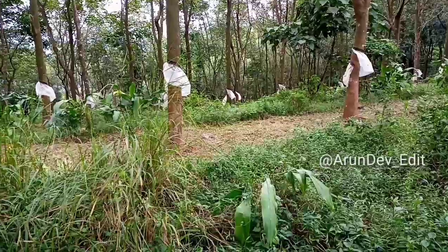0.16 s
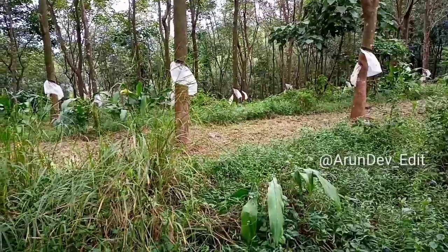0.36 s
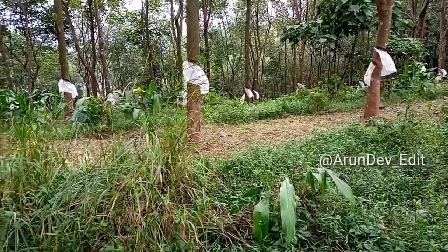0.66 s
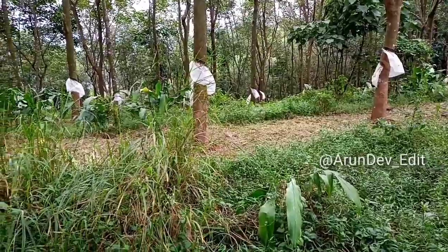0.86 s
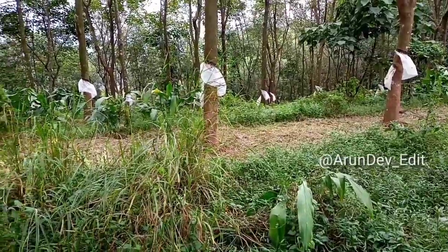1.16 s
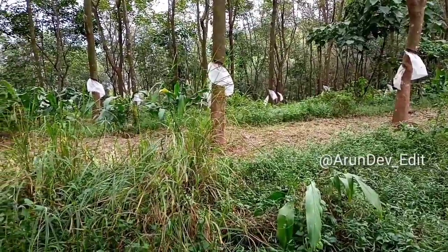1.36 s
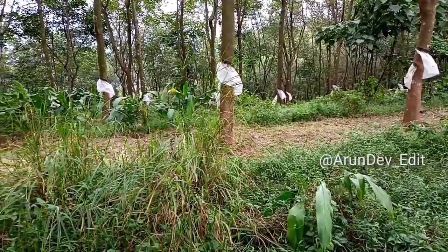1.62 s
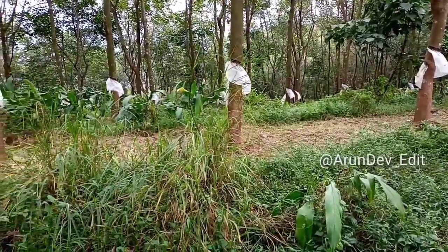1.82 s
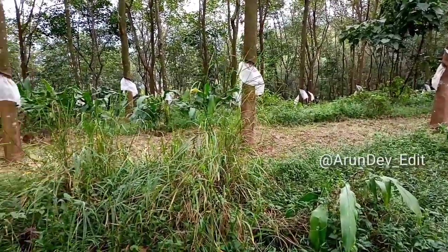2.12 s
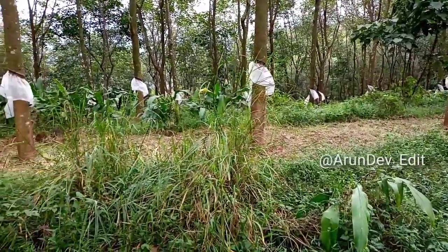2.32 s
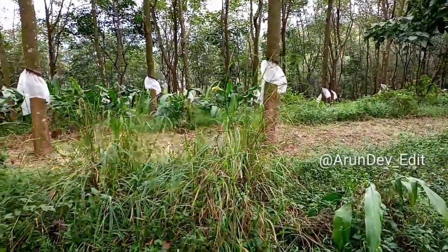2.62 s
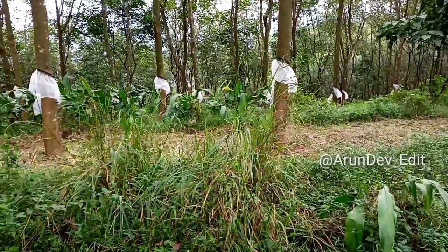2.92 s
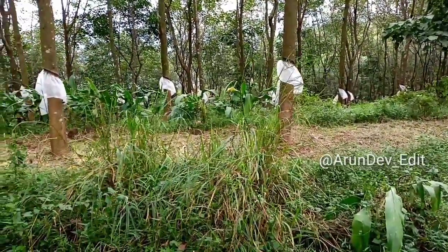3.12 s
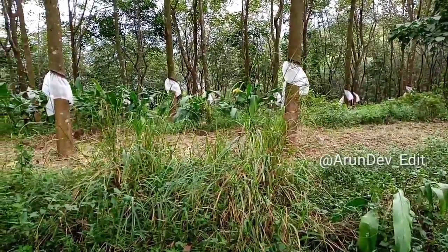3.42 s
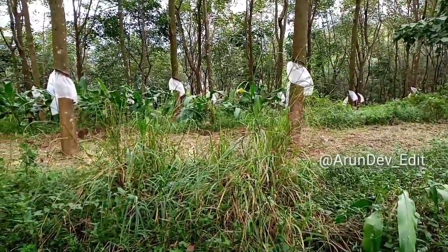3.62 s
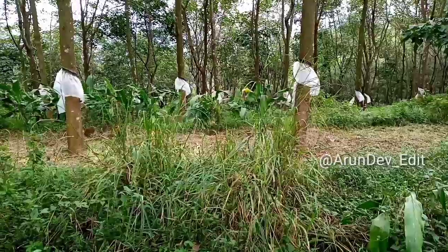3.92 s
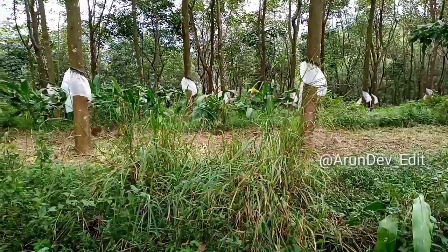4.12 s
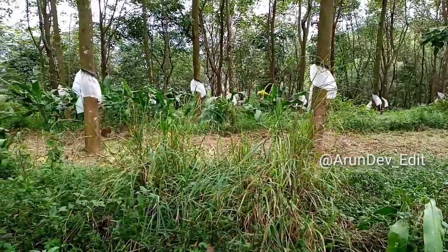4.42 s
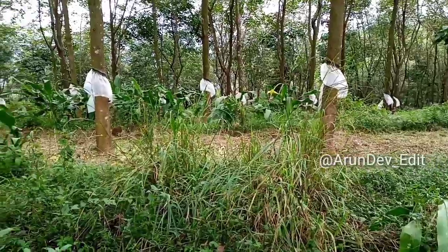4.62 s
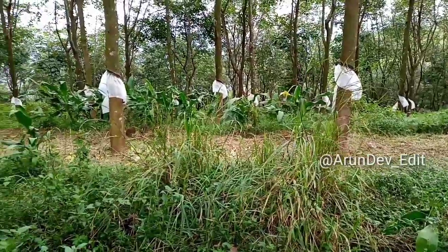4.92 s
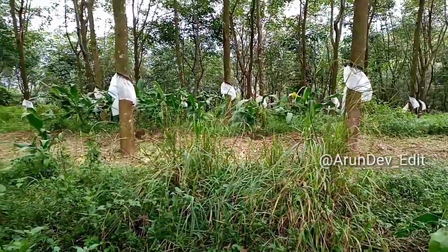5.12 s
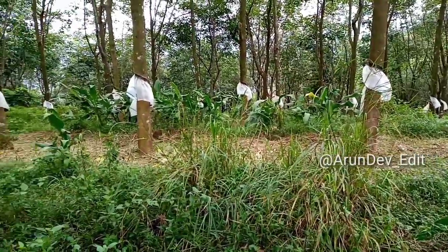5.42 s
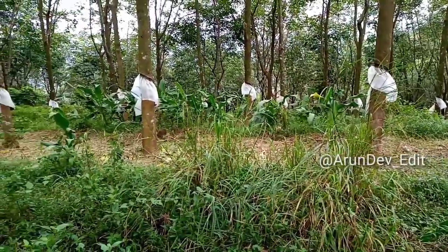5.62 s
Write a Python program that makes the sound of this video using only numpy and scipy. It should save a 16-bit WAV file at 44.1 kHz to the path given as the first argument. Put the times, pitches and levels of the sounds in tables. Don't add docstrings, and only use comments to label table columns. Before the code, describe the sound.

From 0 seconds a shrill cicada drone fills a wooded plantation and never stops. Two near singers ring with a thin, buzzing metallic tone around 9 kHz, with only faint lower hums. One steps down through short notes about six times a second, then leaps up again; the other jumps and slides more irregularly. Behind them a distant chorus swells slowly as a noisy, ringing hiss, strongest near 4 seconds, then eases. At about 2.5 seconds a sharp knock, a click with a brief low thump, strikes the microphone. After roughly 3.5 seconds the pitch steps flatten into longer notes with a rapid fluttering warble. Soft, dull handling bumps come around 4.2 and 4.6 seconds; a tiny dry tick at 5.45 is followed by a faint thud at 5.5. Very faint cricket pulses, small rasps, leaf hiss and low rumble lie beneath. The drone continues to the end at about 5.8 seconds.

```python
import sys
import numpy as np
from scipy import signal
from scipy.fft import rfft, irfft, next_fast_len
from scipy.io import wavfile
from scipy.ndimage import uniform_filter1d, map_coordinates

SR = 44100
rng = np.random.default_rng(int(sys.argv[2]) if len(sys.argv) > 2 else 0)


def boost_factor(decibels):
    exponent = np.asarray(decibels, float) / 20
    return 10 ** exponent


def bounce(signal):
    frames = np.transpose(np.atleast_2d(signal))
    limited = np.clip(frames, -1, 1)
    pcm = np.round(limited * 32767).astype(np.int16)
    wavfile.write(sys.argv[1], SR, pcm)


N = 254016
TIME = np.arange(N) / SR


def unit(x):
    return x / np.sqrt(np.mean(x ** 2) + 1e-20)


def curves(rows):
    times, *columns = np.transpose(rows)
    return [np.interp(TIME, times, column) for column in columns]


def wobble(rate):
    knots = rng.standard_normal(1000)
    return map_coordinates(knots, [TIME * rate])


def filtered(x, response):
    length = next_fast_len(N + SR // 2)
    hz = np.fft.rfftfreq(length, 1 / SR) + 1e-3
    return irfft(rfft(x, length) * response(hz), length)[:N]


def rush(response, patchy_db, size=512, span=(4, 14)):
    grains = signal.stft(rng.standard_normal(N + size), nperseg=size)[2]
    field = uniform_filter1d(rng.standard_normal(grains.shape), span[0], axis=0)
    field = uniform_filter1d(field, span[1], axis=1)
    noise = signal.istft(grains * boost_factor(patchy_db * unit(field)), nperseg=size)[1][:N]
    return unit(filtered(noise, response))


def spectrum(points):
    f, db = np.transpose(points)
    return lambda hz: boost_factor(np.interp(np.log(hz), np.log(f), db))


def band(hz, width):
    return lambda f: 1 / np.sqrt(1 + (2 * (f - hz) / width) ** 4)


def swelling(s, half):
    return np.exp(-((TIME - s) / half) ** 2)


# (frequency [Hz], level [dB])
AIR_COLOUR = [(60, -26), (200, -12), (500, -8), (1000, -12), (1900, -4.5), (2600, -2.5), (3200, -7),
              (5400, -11), (7700, 1), (10700, -4.5), (12900, -3), (14000, -5), (14800, 11.5), (15500, 9)]
# (frequency [Hz], level [dB])
RUMBLE_COLOUR = [(25, -41), (60, -7), (110, -2.5), (200, -6), (350, -19), (700, -70)]


def air():
    rumble = boost_factor(-75.5 + 1.1 * wobble(4.02)) * rush(spectrum(RUMBLE_COLOUR), patchy_db=2.5)
    hiss = boost_factor(-51.8 + 0.87 * wobble(25)) * rush(spectrum(AIR_COLOUR), patchy_db=1.6)
    return hiss + rumble


# (time [s], level [dB])
CHORUS_LEVEL = [(0, -42), (.15, -39.5), (1.35, -36), (2.2, -34), (2.5, -34.5), (3.88, -32), (4.12, -34.5),
                (5.25, -35.5), (5.76, -39)]
# (frequency [Hz], width [Hz], level [dB])
CHORUS_BANDS = [(2336, 135, -21.5), (4613, 325, -28), (7070, 575, -22), (8470, 510, -13), (9204, 500, 0.5),
                (11570, 630, -30.5), (14900, 380, -56)]


def chorus():
    def resonances(f):
        return np.sqrt(sum((boost_factor(db) * band(hz, width)(f)) ** 2 for hz, width, db in CHORUS_BANDS))

    level_db, = curves(CHORUS_LEVEL)
    blur = rush(resonances, patchy_db=3.3, size=2048, span=(2, 5))
    low_voices = filtered(blur, lambda f: f < 8900)
    low_db = -2.5 + 11 * np.exp(-TIME / 1.7)
    return boost_factor(level_db + 0.26 * wobble(6.35)) * (blur + (boost_factor(low_db) - 1) * low_voices)


# (time [s], half length [s], level [dB])
CRICKET_CALLS = [
    (.1, .15, -75),
    (.65, .18, -71),
    (1.4, .22, -72),
    (1.9, .1, -75),
    (3.4, .12, -76),
    (4.9, .2, -72),
]
# (time [s], half length [s], frequency [Hz], width [Hz], level [dB])
RASPS = [
    (2.69, .04, 6300, 900, -60),
    (4.79, .04, 6500, 900, -60),
]


def other_insects():
    calls = sum(boost_factor(db) * swelling(s, half) for s, half, db in CRICKET_CALLS)
    cricket = calls * boost_factor(-11 + 5 * wobble(30)) * rush(band(3500, 80), patchy_db=1.1)
    flutter_db = 2.8 * wobble(30) + 2.2 * wobble(60)
    katydid = boost_factor(-67 + flutter_db) * rush(band(15200, 900), patchy_db=-1.0)
    chirps = boost_factor(-68.5) * rush(band(6350, 800), patchy_db=6, size=1024, span=(2, 3))
    out = cricket + katydid + chirps
    for s, half, hz, width, db in RASPS:
        out += boost_factor(db) * swelling(s, half) * rush(band(hz, width), patchy_db=1.1)
    return out


# (time [s], frequency [Hz], length [cycles], peak level [dB])
BUMPS = [(1.403, 290, 2.3, -66), (2.054, 200, 1.1, -62), (2.071, 315, 0.92, -58.5),
         (3.978, 130.3, 0.62, -59.5), (4.169, 104, .8, -48.5), (4.192, 109.7, 1.5, -56.5),
         (4.584, 190, 2.9, -61.5), (4.628, 191, 1.2, -56), (4.641, 207, 0.84, -54), (4.668, 182, 4.8, -59),
         (4.687, 209, 0.65, -56), (4.72, 430, 2.9, -71), (5.452, 6900, 3.7, -27.5), (5.29, 543, 6, -73),
         (5.506, 420, 0.64, -48), (5.511, 347, 1, -58.5)]


def bumps():
    out = np.zeros(N)
    for s, hz, cycles, db in BUMPS:
        turns = (TIME - s) * hz
        out += boost_factor(db) * np.exp(-(turns / cycles) ** 2) * np.cos(2 * np.pi * turns + 5.0)
    return out


# (corner [Hz], Q [1])
LOW_CUT = [(75, 0.74), (75, 0.68)]


def knock():
    knock_s, knock_db = 2.53397, -18.7

    def response(f):
        step = SR / (2j * np.pi * f)
        delay_and_softening = np.exp(-2j * np.pi * f * knock_s - (f / 9000) ** 2)
        high_pass = np.prod([-f * f / (c * c - f * f + 1j * f * c / q) for c, q in LOW_CUT], axis=0)
        return step * delay_and_softening * high_pass

    return boost_factor(knock_db) * filtered(signal.unit_impulse(N), response)


def forest(x):
    t = np.arange(SR // 2) / SR
    tail = rng.standard_normal(len(t)) * boost_factor(-60 * t / 0.24)
    return signal.fftconvolve(x, tail / np.linalg.norm(tail))[:N]


def cicada(song, pulse, body, leap_db, sweep=0, chop=0):
    hz, *levels = song
    leaping = np.clip((np.abs(np.gradient(hz)) * SR - 250) / 200, 0, 1)
    quiet_db = -leap_db * uniform_filter1d(uniform_filter1d(leaping, size=1100), size=1100)
    warble = 2 * np.pi * np.cumsum(18.3 + 5 * wobble(8)) / SR
    hz = hz + 1.9 * wobble(40)
    hz = hz + sweep * (signal.sawtooth(warble, .7) + .7 * wobble(12) + .9 * wobble(150))
    tone = 2 * np.pi * np.cumsum(hz) / SR
    beat = 2 * np.pi * np.cumsum(curves(pulse)[0] + 4 * wobble(30)) / SR
    out = np.zeros(N)
    for partials, db in zip(body, levels + [np.mean(levels, axis=0)]):
        for (harmonic, side), rel_db in partials.items():
            depth_db = 1.8 * (1 + .9 * (rel_db < 0))
            gain = boost_factor(db + rel_db + depth_db * wobble(32))
            out += gain * np.sin(harmonic * tone + side * beat + .5 * wobble(20))
    return np.sqrt(2) * boost_factor(quiet_db) * (1 - chop * np.cos(warble - .8)) * out


def sung(ends, effort):
    hz, ring_db, octave_db, hum_db = curves(ends)
    swell_db, buzz_db = curves(effort)
    return [hz, ring_db + swell_db, buzz_db, octave_db, hum_db]


# (start [s], fundamental pitch [Hz])
SLIDER_NOTES = [(0.0, 2225), (0.15, 2292), (0.39, 2204), (0.57, 2305), (0.8, 2227), (0.99, 2310),
                (1.22, 2253), (1.41, 2323), (1.59, 2267), (1.79, 2221), (1.97, 2320), (2.14, 2284),
                (2.3, 2242), (2.49, 2326), (2.64, 2300), (2.79, 2265), (2.95, 2324), (3.1, 2297),
                (3.27, 2278), (3.42, 2326), (3.84, 2251), (3.99, 2296), (4.59, 2297), (5.17, 2296),
                (5.72, 2304)]
# (ring or 4th harmonic [dB], octave [dB], hum or fundamental [dB])
SLIDER_LEVELS = [(-58, -85, -76), (-37, -66, -63), (-39, -67, -59), (-34.5, -62.5, -73), (-32, -69, -62),
                 (-34, -68, -59.5), (-45, -65, -66), (-28.5, -62.5, -55.5), (-42, -59.5, -75),
                 (-31, -65.5, -64), (-36, -62, -57), (-38.5, -64, -67), (-37, -58, -72),
                 (-33.5, -62, -57.5), (-41, -60, -54), (-26, -57.5, -63), (-32.5, -58.5, -58),
                 (-39, -61, -53.5), (-36, -58, -63.5), (-36.5, -58, -54), (-36.5, -60.5, -56),
                 (-33.5, -58, -61.5), (-35.5, -59.5, -60), (-36, -61.5, -57.5), (-39, -56.5, -54)]
# (time [s], leap length [s])
SLIDER_LEAP = [(0, .03), (.2, .13), (1.3, .11), (1.5, .075), (2.05, .07), (2.2, .03), (5.76, .025)]
# (time [s], ring swell [dB], buzz or strongest ring sideband [dB])
SLIDER_EFFORT = [(0, 4, -53), (.2, 1.5, -39), (1, -3, -41), (1.6, -1.5, -42), (2.3, 4.5, -50),
                 (2.7, -4.5, -46), (3.2, 3, -40), (3.5, 2.5, -55), (3.7, -1, -34.5), (4.1, 1, -35),
                 (4.28, -1.5, -40.5), (4.43, 3, -37), (4.62, -7, -31.5), (4.78, 8.5, -51),
                 (4.95, -4.5, -39), (5.2, -2, -40), (5.44, 1, -35.5), (5.76, 5, -34)]
# (time [s], rate [1/s])
SLIDER_PULSE = [(0, 296), (2.8, 292), (3.6, 284), (4.1, 278), (5.76, 279)]
SLIDER_PARTIALS = [
    {(4, 0): 0, (4, 1): -19},
    {(4, -1): 0, (4, -2): -19, (4, -3): -29},
    {(2, 0): 0, (2, -1): -17, (2, 1): -18},
    {(1, 0): 0, (1, 1): -28},
    {(3, 0): -10, (3, -1): -30, (3, -2): -22, (3, -3): -32, (3, 2): -22, (5, 0): -17, (5, -1): -22, (6, 0): -26, (6, -1): -28},
]


def slider():
    slide_hz_per_s, floor_hz = 104, 2242
    ends = []
    next_starts = [s for s, _ in SLIDER_NOTES[1:]] + [N / SR]
    for (s, hz), following, db in zip(SLIDER_NOTES, next_starts, SLIDER_LEVELS):
        length = following - s - np.interp(s, *np.transpose(SLIDER_LEAP))
        is_long = length > .3
        fall = min(length, (hz - floor_hz) / slide_hz_per_s) * is_long
        low = hz - slide_hz_per_s * fall
        ends += [(s, hz, *db), (s + fall, low, *db), (s + length, low, *db)]
    return cicada(sung(ends, SLIDER_EFFORT), SLIDER_PULSE, SLIDER_PARTIALS, leap_db=22, chop=.3)


# (start [s], fundamental pitch [Hz])
STEPPER_NOTES = [(0.03, 2377), (0.2, 2339), (0.36, 2412), (0.54, 2371), (0.7, 2342), (0.87, 2412),
                 (1.03, 2372), (1.21, 2337), (1.37, 2405), (1.52, 2365), (1.7, 2338), (1.87, 2400),
                 (2.03, 2361), (2.2, 2332), (2.32, 2397), (2.52, 2361), (2.68, 2388), (2.82, 2359),
                 (2.98, 2386), (3.12, 2361), (3.27, 2375), (3.45, 2383), (3.62, 2370), (3.82, 2379),
                 (3.98, 2363), (4.11, 2373), (4.27, 2362), (4.5, 2358)]
# (ring [dB], octave [dB], hum [dB])
STEPPER_LEVELS = [(-41.5, -60, -58.5), (-36.5, -60, -59.5), (-38.5, -64.5, -58), (-38, -59.5, -54.5),
                  (-38.5, -63, -56), (-38.5, -61, -57), (-38.5, -65, -54.5), (-37, -63, -62),
                  (-33, -68, -60.5), (-44.5, -61.5, -52), (-40, -64, -62), (-40, -59.5, -52.5),
                  (-34, -65, -55), (-33, -74, -58), (-44, -63, -54), (-44, -65, -56), (-36.5, -65.5, -53.5),
                  (-41, -73, -53), (-38, -68, -57.5), (-39, -73, -55.5), (-36.5, -64, -57.5),
                  (-37.5, -71, -65), (-47, -73, -70), (-43.5, -66, -64.5), (-41, -78, -63),
                  (-41.5, -75, -67), (-48, -70, -72), (-42.5, -68.5, -65.5)]
# (time [s], ring swell [dB], buzz [dB])
STEPPER_EFFORT = [(0, -0.5, -52), (1.3, 0.5, -49), (2.5, -2, -54), (3.3, -1, -55), (4.3, 0, -58.5),
                  (5.76, -3, -55.5)]
# (time [s], rate [1/s])
STEPPER_PULSE = [(0, 260), (1.5, 268), (5.76, 266)]
STEPPER_PARTIALS = [
    {(4, 0): 0, (4, -1): -19},
    {(4, 1): 0, (4, 2): -10, (1, 1): -24, (2, 1): -30},
    {(2, 0): 0},
    {(1, 0): 0},
    {(3, 0): -7, (3, 1): -24, (3, -1): -16, (5, 0): -16, (5, -1): -22, (5, 1): -26, (6, 0): -30},
]
# (time [s], pitch sweep [Hz], amplitude chop [1])
WARBLE_DEPTH = [(0, 0, 0), (3.35, 0, 0), (3.5, 8, .7), (4.2, 14, .8), (4.6, 28, .5), (5.76, 30, .5)]


def stepper():
    leap_s, sag_hz_per_s, longest_sag_s, fade_db_per_s = .04, 35, .2, 20
    ends = []
    note_ends = [s - leap_s for s, _ in STEPPER_NOTES[1:]] + [N / SR]
    for (s, hz), until, db in zip(STEPPER_NOTES, note_ends, np.array(STEPPER_LEVELS)):
        held = min(until - s, longest_sag_s)
        fade_db = fade_db_per_s * held / 2
        ends += [(s, hz, *db + fade_db), (until, hz - sag_hz_per_s * held, *db - fade_db)]
    sweep, chop = curves(WARBLE_DEPTH)
    return cicada(sung(ends, STEPPER_EFFORT), STEPPER_PULSE, STEPPER_PARTIALS, 17, sweep, chop)


def scene():
    near = stepper() + slider()
    singers = near + boost_factor(-10.0) * forest(near)
    background = chorus() + other_insects() + air()
    return (singers + background + bumps() + knock())[None]


def low_pass(x):
    return signal.sosfilt(signal.butter(12, 16850, fs=SR, output="sos"), x)


def record(dry):
    mix = filtered(dry[0], lambda f: f < 15490)[None]
    return low_pass(mix)


dry = scene()
out = record(dry)
bounce(out)
```